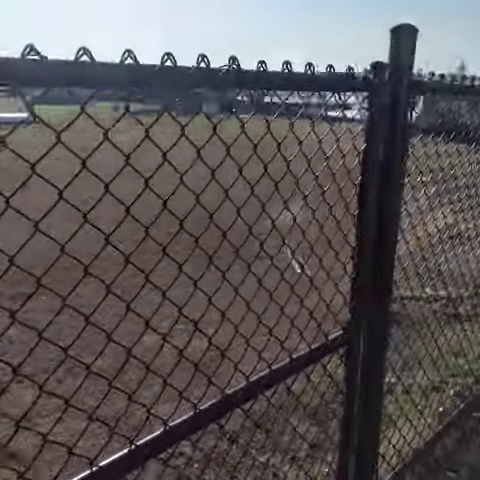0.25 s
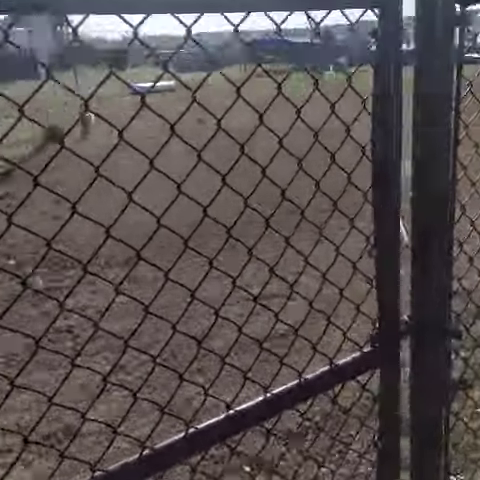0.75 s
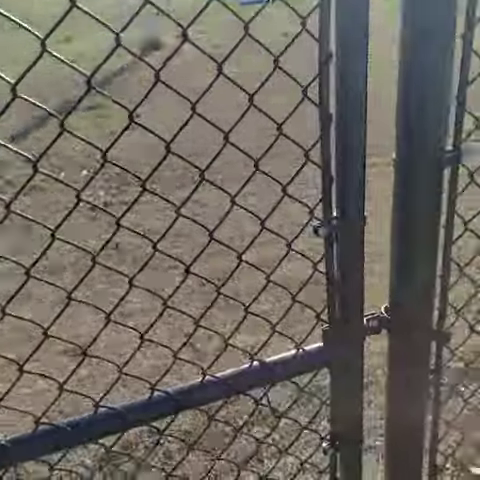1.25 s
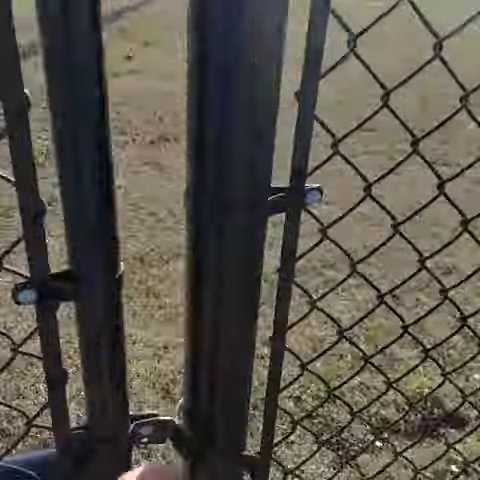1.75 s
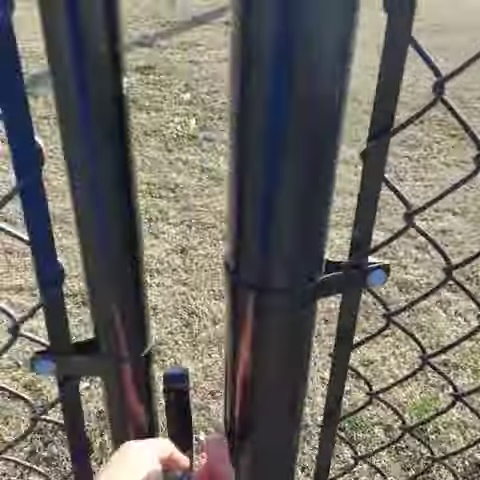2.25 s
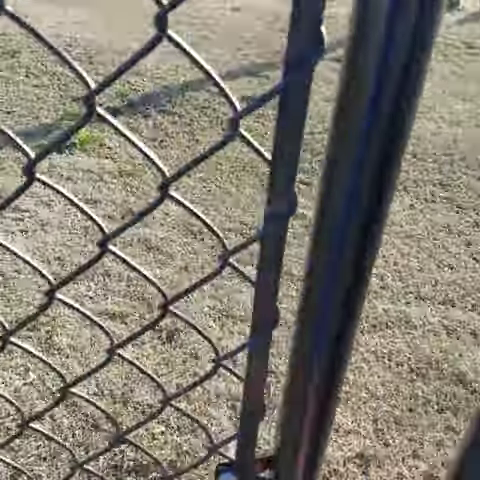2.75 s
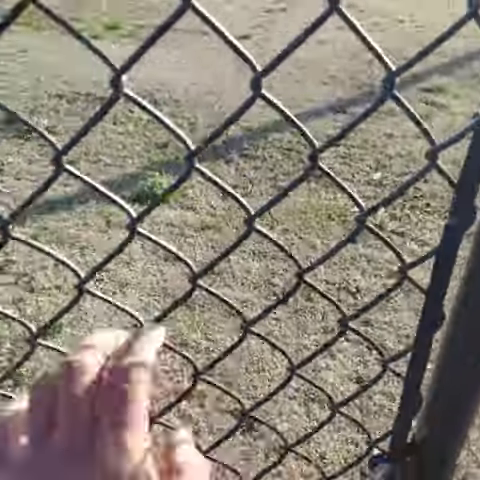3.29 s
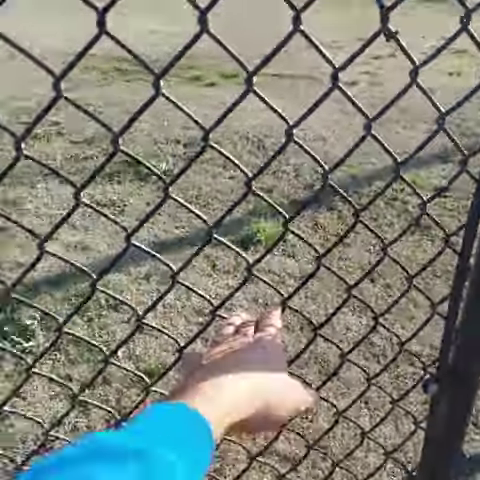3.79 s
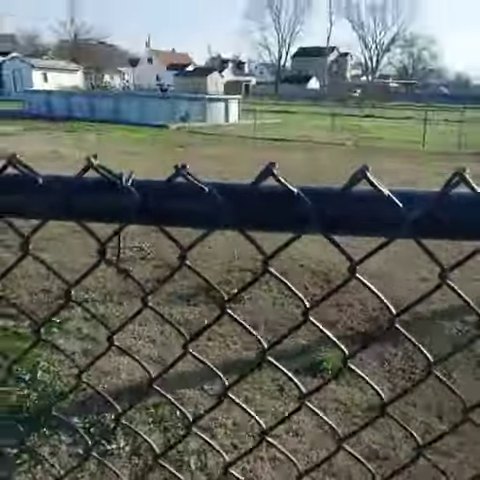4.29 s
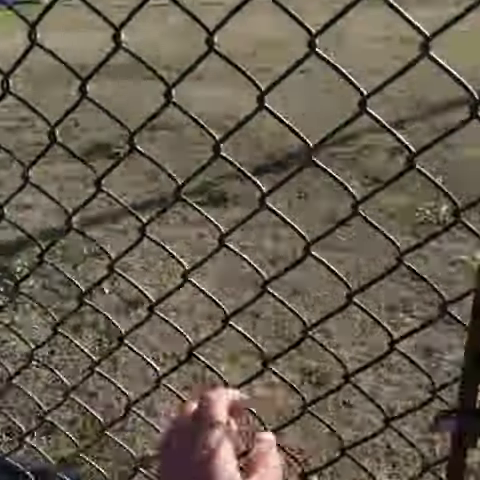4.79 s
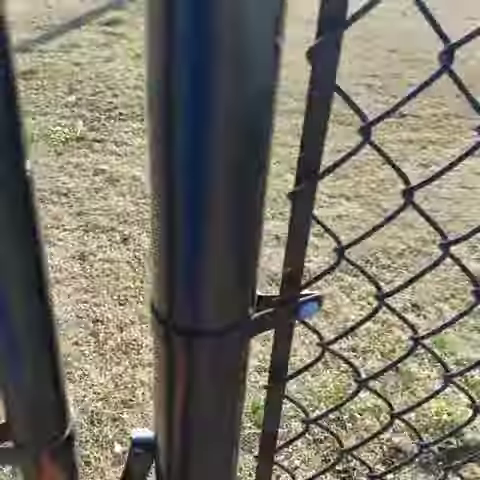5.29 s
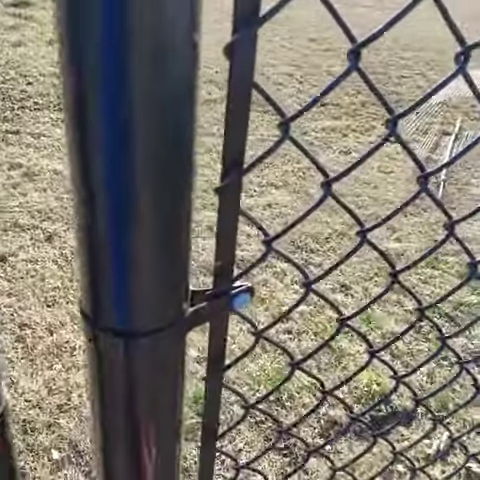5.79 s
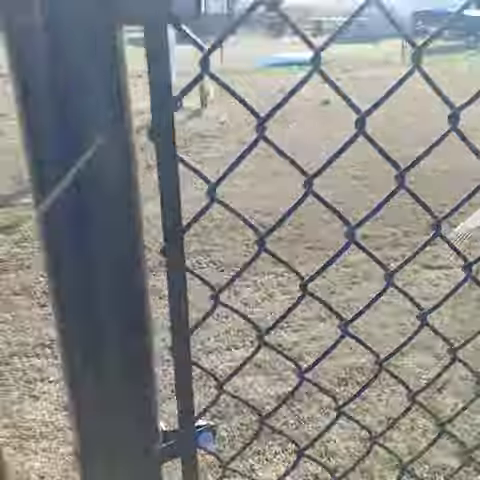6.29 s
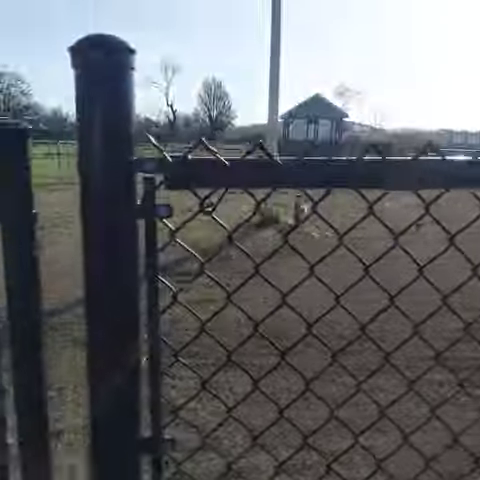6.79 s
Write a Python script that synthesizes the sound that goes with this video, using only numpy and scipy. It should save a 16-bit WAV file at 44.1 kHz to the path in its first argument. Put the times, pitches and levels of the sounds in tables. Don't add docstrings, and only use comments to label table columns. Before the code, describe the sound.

Outdoors by a chain-link gate, a bird chirps first while hollow bangs boom and roll across an open field over low traffic rumble. Then a steel latch close to a handheld stereo microphone is lifted and knocked in short chattering clanks, swings with a bright rattle, thuds and catches, and finally drops loudly and seats with the hardest clank. Dry grass rustles faintly underfoot.

```python
import sys
import numpy as np
from scipy import signal
from scipy.fft import rfft, irfft
from scipy.io import wavfile
from scipy.ndimage import uniform_filter1d

SR = 44100
rng = np.random.default_rng(int(sys.argv[2]) if len(sys.argv) > 2 else 0)


def to_wav(sig):
    pcm = np.clip(np.atleast_2d(sig), -1, 1) * 32767
    pcm = np.round(pcm).astype(np.int16)
    wavfile.write(sys.argv[1], SR, pcm.T)


def elevation(decibels):
    levels = np.asarray(decibels, float)
    return 10 ** (levels / 20)


N = 310905

# (frequency [Hz], level [dB])
TRAFFIC = [(12, -43), (20, -18), (65, -1), (127, 0.5), (241, -9), (285, -14.5), (446, -22.5), (1260, -21.5),
           (2460, -28), (3440, -38), (5850, -39.5), (8180, -44.5), (9400, -55), (12800, -55.5),
           (16000, -58)]
# (time [s], level [dB])
TRAFFIC_NEARNESS = [(0.0, -49.5), (0.61, -52.5), (1.0, -49.5), (1.49, -52), (3.77, -52.5), (4.14, -59),
                    (4.36, -48), (4.59, -55), (5.99, -52), (6.4, -53.5), (6.81, -49.5), (7.05, -53)]
# (frequency [Hz], correlation [-1..1])
PORT_LIKENESS = [(60, 1), (150, 0.98), (380, 0.93), (950, 0.52), (2380, 0.13), (5980, -0.16), (15000, 0.02)]
# (start [s], length [s], strength [dB], brightness [dB])
ECHO_ROLLS = [
    (0.0, 0.29, -52, -7),
    (.68, 0.64, -37.5, -21.5),
    (2.03, 0.17, -48, -26),
    (2.5, 0.36, -59.5, -1),
    (3.5, 0.16, -39.5, -41),
    (4.17, 0.3, -40, -11.5),
    (5.78, 0.21, -47.5, -3.5),
    (6.63, 0.4, -44, -18),
]
# (frequency [Hz], level [dB])
ECHO_TOP = [(1500, -3), (2700, -7.5), (3100, -12), (4600, -16.5), (6000, -26.5)]
# (time [s], peak [dB], bright part [dB], treble part [dB], body note [Hz])
BANGS = [(0.6559, -37.5, 8.5, -20, 200), (0.664, -15, -3.5, -24, 249), (0.894, -19, -11, -28.5, 223.5),
         (1.044, -33, 1.5, -23, 256), (1.071, -18, -3.5, -26, 248.6), (1.235, -28.5, -11, -29, 257.4),
         (1.995, -45, 4, -15, 256), (2.024, -26.5, -6.5, -22, 256), (3.501, -19, -6.5, -21, 275.4),
         (3.738, -23, -36, -32, 276.5), (3.785, -27, -16.5, -29, 261), (4.16, -23, -7.5, -17.5, 229),
         (4.293, -25, -13, -35, 271.6), (4.35, -25, -22, -24, 287), (4.942, -29, -8, -26, 185.5),
         (6.613, -28.5, -5, -29, 313.4), (6.661, -26.5, -5, -24, 189)]
# (frequency [Hz], level [dB])
BANG_BODY = [(35, -53), (60, -11), (110, -5.5), (230, 0), (330, -10.5), (480, -19.5), (800, -30),
             (1800, -30), (3300, -80)]
# (frequency [Hz], level [dB])
BANG_EDGE = [(350, 17), (600, -2), (829, -6.5), (1940, -5.5), (3270, -9), (3650, -8), (8180, -12),
             (9490, -22.5), (15000, -32)]
# (frequency [Hz], level [dB])
GRASS_FIZZ = [(1760, -33), (3000, 4), (4900, 3), (6130, 2), (6570, -3.5), (8700, -2.5), (9870, -12),
              (12500, -4), (15200, -13.5), (16000, -9.5)]
# (start [s], length [s], strength [dB], dullness [dB])
STEPS = [(0.0, 0.086, -61.5, 4.5), (.62, 0.055, -60.5, 0), (.8, 0.49, -72, 2), (1.53, 0.3, -66.5, 2.5),
         (1.92, 0.16, -62, 3.5), (2.3, 0.59, -78, 2), (2.92, 0.46, -69, 3), (3.4, 0.44, -76.5, 12.5),
         (4.18, 0.25, -75, 13.5), (4.7, 0.51, -69.5, 4), (5.2, 0.17, -78, 11), (5.55, .55, -77.5, 10.5),
         (6.67, .45, -68.5, 6.5)]
# (time [s], peak [dB])
STALK_SNAPS = [
    (1.2675, -43),
    (1.3054, -45.5),
    (3.0924, -44),
    (3.1243, -46),
    (3.1697, -46),
    (5.1138, -40.5),
    (5.2689, -47.5),
    (6.0854, -48),
]
# (time [s], pitch [Hz], level [dB])
NOTES = [
    [(.018, 3900, -52), (.035, 4470, -53), (.058, 4460, -57), (.075, 4250, -51), (.097, 3150, -53)],
    [(.02, 3300, -60), (.04, 4000, -55), (.055, 4350, -54)],
    [(2.645, 4010, -65), (2.665, 4070, -68), (2.69, 3440, -63), (2.71, 3450, -55)],
    [(5.655, 3900, -51), (5.675, 4220, -51), (5.682, 3300, -53), (5.69, 4070, -50), (5.697, 3600, -62),
     (5.705, 3850, -59), (5.72, 3800, -55)],
    [(6.53, 5250, -64), (6.537, 5700, -63), (6.565, 5700, -64)],
]
# (start [s], end [s], pitch [Hz], rate [notes/s], level [dB])
TRILLS = [
    (.14, .52, 2650, 9.1, -71),
    (2.47, 2.95, 2550, 38, -69),
    (4.6, 4.85, 2450, 38, -76),
    (6.49, 7.0, 2750, 31, -68),
]

# (time [s], peak [dB], dull part [dB], bright part [dB], ring [dB])
LIFT = [
    (2.2138, -28.5, -1, -16, 4),
    (2.2310, -28, -2, -24, -1),
]
# (time [s], peak [dB], dull part [dB], bright part [dB], ring [dB])
SLIDE = [
    (2.2387, -29.5, -3, -26, 2),
    (2.2985, -45, -6, -24, 4.6),
    (5.7300, -45.5, -8.5, -24, 4),
]
# (time [s], peak [dB], dull part [dB], bright part [dB], ring [dB])
KNOCK = [
    (2.2785, -30.5, 11, -30, 4.5),
    (2.2919, -30, 8, -25, 3),
    (2.523, -41.5, 2.2, -20, -4),
]
# (time [s], peak [dB], dull part [dB], bright part [dB], ring [dB])
STRIKE = [
    (2.3689, -21, 0.23, -18.5, 3.5),
    (2.3850, -32.5, 2, -20, -1),
]
# (time [s], peak [dB], dull part [dB], bright part [dB], ring [dB])
SWING = [
    (3.2458, -16, -5.5, -26, -1),
    (3.2658, -16, -7.5, -40, -1.5),
    (3.2790, -27, -8, -40, -4),
    (3.2914, -26.5, -14, -34, -2),
    (3.2980, -29, -10, -38, 1),
]
# (time [s], peak [dB], dull part [dB], bright part [dB], ring [dB])
HOOK = [
    (3.3040, -31.5, -9, -24, 8.9),
]
# (time [s], peak [dB], dull part [dB], bright part [dB], ring [dB])
PINGS = [
    (3.3654, -34.5, -5, 2, 3.5),
    (3.3710, -36.5, -1, -15, 8.7),
    (3.4051, -28.5, -4, -8, 3.2),
    (3.4381, -40, -17, -12, 2.7),
    (5.1094, -58, -1, 2, 2.7),
]
# (time [s], peak [dB], dull part [dB], bright part [dB], ring [dB])
NUDGE = [
    (2.0515, -25, 1, -17, 7),
    (3.7723, -42, -14, -26, -15),
    (5.721, -32, -20, -45, -1),
    (2.2880, -38, -14, -23, -6),
    (5.8127, -14.5, -5, -14, 0),
    (5.8681, -19, -16.5, -37, -11),
    (5.8760, -28.5, -14, -43, -12),
    (4.1830, -40, -8, -30, -4),
    (6.6740, -43, -11, -30, -1),
]
# (time [s], peak [dB], dull part [dB], bright part [dB], ring [dB])
THUD = [
    (5.1738, -29.5, 9.1, -24, 4.2),
    (5.1880, -39, 14, -30, 4.6),
    (5.5210, -36, 12, -25, 3.2),
    (5.6310, -39, 6.6, -25, 2),
    (5.6390, -41, 8, -25, 2),
]
# (time [s], peak [dB], dull part [dB], bright part [dB], ring [dB])
CATCH = [
    (5.3327, -17.5, -0.1, -17, 4),
    (5.3455, -28, -1, -8, -8),
]
# (time [s], peak [dB], dull part [dB], bright part [dB], ring [dB])
FORK = [
    (1.9064, -42.5, -17, 12, 2),
    (5.5040, -56, -2, -7, 5),
    (5.5250, -44, 2, -6, 7.5),
    (6.0370, -37.5, -1, -23, 2.5),
    (6.1425, -32, 6, -30, -11),
    (6.1800, -59, 0, -22, 9),
    (6.1900, -56, 0, -22, 7),
    (6.5542, -37, 1, -41, -7),
]
# (time [s], peak [dB], dull part [dB], bright part [dB], ring [dB])
DROP = [
    (5.7818, -7.5, -9.5, -9, 1),
    (5.7944, -16.5, -5.5, -24, 0),
]
# (time [s], peak [dB], dull part [dB], bright part [dB], ring [dB])
SEAT = [
    (5.9557, -12.5, -11, -24, -10.5),
    (5.9654, -20.5, 3.5, -30, -4),
    (5.9700, -7, -10.5, -16.5, -1.5),
    (5.9770, -12, -10.5, -16.5, -1.5),
    (5.9890, -28, -1, -28, 0),
]

# (frequency [Hz], level [dB], t60 [s])
LIFT_MODES = [(617, -2, .06), (1074, 6, .04), (1733, -3, 0.087), (3300, -1.5, .07), (3900, -5.5, .06),
              (4850, -8, .07), (6309, -8, 0.098), (7520, -11, .05), (8040, -4, .045), (9260, -16, .09)]
# (frequency [Hz], level [dB], t60 [s])
SLIDE_MODES = [(3337, 0.5, 0.17), (3700, -13, .04), (1000, -5, 0.0302), (7520, -15, 0.0305)]
# (frequency [Hz], level [dB], t60 [s])
KNOCK_MODES = [(470, -2.5, 0.065), (1065, 5.5, 0.042), (1810, -8, 0.033), (3900, -7, 0.045),
               (4200, -19, .03), (5900, -26, .03)]
# (frequency [Hz], level [dB], t60 [s])
STRIKE_MODES = [(610, -7.5, .04), (1203, 4.5, 0.04), (1763, 0, .06), (1870, -7, 0.061), (3320, -5, .05),
                (3467, 1, 0.085), (3980, -13, .08), (4818, -14, .05), (8100, -20, .06)]
# (frequency [Hz], level [dB], t60 [s])
SWING_MODES = [(1000, -7, .022), (1750, -15, 0.45), (2293, 4.5, 0.032), (2296, -18.5, 0.46),
               (2820, -11, .22), (3340, -3, 0.093), (4150, 0, .06), (4600, 2, .035), (5040, 1, 0.026),
               (5760, -5, 0.048), (6400, -20, 0.28), (7520, -18, 0.39), (8070, -19, 0.25), (3920, -11, .1)]
# (frequency [Hz], level [dB], t60 [s])
HOOK_MODES = [(3720, 0, .15), (1750, -12, .3)]
# (frequency [Hz], level [dB], t60 [s])
PING_MODES = [(975, -11, .05), (2250, -16, 0.058), (3270, 3.5, .045), (3480, -9, 0.043), (5030, -16, .02)]
# (frequency [Hz], level [dB], t60 [s])
NUDGE_MODES = [(1081, 1, 0.0303), (2000, -7.5, .03), (3230, -21, .12), (3815, -7, .09), (4320, 9.5, 0.021),
               (4750, 0, .03), (6100, -17, .027), (6340, -15, .045)]
# (frequency [Hz], level [dB], t60 [s])
THUD_MODES = [(487, -7, 0.058), (1146, -3.5, 0.057), (1576, 5, 0.027), (2213, -16, 0.036),
              (3335, -19.5, 0.18)]
# (frequency [Hz], level [dB], t60 [s])
CATCH_MODES = [(768, -12, 0.14), (1627, 11.5, 0.024), (2070, 1.5, 0.024), (2956, 7.5, 0.058),
               (3310, -13, 0.21), (3856, -4, 0.19), (3900, 5, 0.078), (4100, -18, 0.17), (5570, -28, .2),
               (6213, -10, 0.035), (7278, -19, 0.17), (8200, -19, 0.036)]
# (frequency [Hz], level [dB], t60 [s])
FORK_MODES = [(2950, -24, 0.054), (3827, 0, 0.18), (3870, -6, .06), (7300, -18, 0.11), (7500, -15, 0.036)]
# (frequency [Hz], level [dB], t60 [s])
DROP_MODES = [(698, -14, .06), (1933, -18.5, 0.097), (2850, -28.5, 0.28), (3360, -26, 0.51),
              (3800, -25.5, .25), (4273, -8, .045), (4650, -12, .08), (5520, -20.5, 0.12),
              (6320, 0.5, .042), (7330, -11, 0.15), (7610, -0.5, .045), (9270, -37.5, .15),
              (11730, -30, .14), (12600, -22, .08)]
# (frequency [Hz], level [dB], t60 [s])
SEAT_MODES = [(554, -3.5, 0.026), (1044, -7.5, 0.046), (1604, -5.5, .03), (2640, -11, 0.044),
              (3300, -15.5, 0.15), (3860, -2.5, .07), (3937, 1, 0.1), (4400, -1, .035), (4680, -2, .045),
              (5410, -20, .09), (7284, -10, 0.09), (7634, -9.5, 0.037), (11720, -20, .09),
              (12700, -15, .03)]
BAR_HZ = np.array([3329, 3465, 3720, 3815, 3905, 6368, 7281, 7554])
# (frequency [Hz], level [dB])
CLANK = [(180, -35), (400, -15.5), (1000, -11.5), (2200, -5.5), (4200, 6.5), (7000, -13.5), (10200, -29),
         (12800, -24.5), (16000, -37)]
# (frequency [Hz], phase [rad])
LATCH_PHASE = [(500, .8), (1300, 1.7), (1600, 4.6), (2000, 6.6), (3400, 8.2), (4000, 11.1), (5000, 11),
               (6400, 12.9), (8500, 11), (13000, 10.5)]
CHATTER_S = {"lift": 0.076, "slide": 0.044, "knock": 0.06, "strike": 0.042, "swing": 0.028, "hook": 0.044,
             "pings": .025, "nudge": 0.047, "thud": .03, "catch": 0.062, "fork": 0.046, "drop": 0.089,
             "seat": .05}
DAMPED_S = {"swing": 3.364, "hook": 3.356}


def evened(x):
    return x / np.sqrt(np.mean(x ** 2) + 1e-20)


def read(points, hz):
    f, value = np.transpose(points)
    return np.interp(np.log(hz + 1), np.log(f + 1), value)


def add(mix, s, sound):
    part = mix[..., round(s * SR):][..., :sound.shape[-1]]
    part += sound[..., :part.shape[-1]]


def coloured(x, spectrum, lo_hz=0, hi_hz=30000):
    hz = np.fft.rfftfreq(x.shape[-1], 1 / SR) + 1
    edges = 1 / (1 + (lo_hz / hz) ** 6) / (1 + (hz / hi_hz) ** 6)
    return evened(irfft(rfft(x) * elevation(read(spectrum, hz)) * edges, x.shape[-1]))


def pair(x, likeness=0.98):
    hz = np.fft.rfftfreq(x.shape[-1], 1 / SR)
    same = np.clip(likeness * read(PORT_LIKENESS, hz), -1, 1)
    left, other = rfft(x)
    right = same * left + np.sqrt(1 - same ** 2) * other
    return irfft(np.array([left, right]), x.shape[-1])


def air():
    return pair(rng.standard_normal((2, N)))


def lumps(per_s, depth_db):
    width = int(SR / per_s)
    drift = uniform_filter1d(uniform_filter1d(rng.standard_normal(N), width), width)
    return elevation(depth_db * evened(drift))


def swells(rows, rise_s, fall_s, calm_db):
    t = np.arange(N) / SR
    power = np.ones((2, N)) * elevation(np.array(calm_db))[:, None] ** 2
    for start, length, db, tilt_db in rows:
        rise = np.clip((t - start) / rise_s + .5, 0, 1)
        fall = elevation(-20 * np.maximum(t - start - length, 0) / fall_s)
        power += (elevation(np.array([[db], [db + tilt_db]])) * rise * fall) ** 2
    return np.sqrt(power)


def traffic():
    near_db = np.interp(np.arange(N) / SR, *np.transpose(TRAFFIC_NEARNESS))
    rumble_db = -36.5 + 0.092 * (near_db - near_db.mean())
    rumble = coloured(air(), TRAFFIC, 29, 174.4) * elevation(rumble_db) * lumps(25, 1.3)
    hiss = coloured(air(), TRAFFIC, 389, 1800) * elevation(near_db) * lumps(23, 2.43)
    top = coloured(air(), TRAFFIC, 3500)
    wind = coloured(rng.standard_normal((2, N)), TRAFFIC, 30.3, 90) * lumps(8, 3.1)
    return rumble + elevation(1.5) * hiss + elevation(-67.0) * top + elevation(-58) * wind


def echoes():
    low_gain, high_gain = swells(ECHO_ROLLS, rise_s=0.078, fall_s=0.085, calm_db=[-47, -66])
    low = coloured(air(), TRAFFIC, 171.5, 557) * low_gain * lumps(28, 3.47)
    high = coloured(air(), ECHO_TOP, 1700, 6000) * high_gain * lumps(40, 1.1)
    return low + high


def bang(s, db, bright_db, treble_db, hz):
    t = np.arange(SR // 2) / SR
    t60 = max(0.23 + 0.018 * (-14.5 - db), .05)
    boom = coloured(pair(rng.standard_normal((2, len(t)))), BANG_BODY)
    boom += 1.33 * np.sin(2 * np.pi * hz * t)
    boom *= (1 - np.exp(-t / 0.0013)) * elevation(-60 * t / t60)
    edge = coloured(pair(rng.standard_normal((2, len(t))), 2.1), BANG_EDGE, 374, 3230)
    treble = coloured(rng.standard_normal((2, len(t))), BANG_EDGE, 2700)
    edge += elevation(treble_db - bright_db + 2.0) * treble
    edge_fall = elevation(-60 * t / (0.34 * t60)) + 0.31 * elevation(-60 * t / (2.1 * t60))
    edge *= (1 - np.exp(-t / 0.0025)) * edge_fall
    return s, elevation(db - 9.5) * (boom + elevation(bright_db + 4.5) * edge)


def birds():
    out = np.zeros(N)
    for rows in NOTES:
        s, hz, db = np.transpose(rows)
        t = np.arange(s[0], s[-1], 1 / SR)
        phase = 2 * np.pi * np.cumsum(np.interp(t, s, hz)) / SR
        tone = np.sin(phase) * elevation(np.interp(t, s, db))
        add(out, s[0], tone * lumps(270, 4.2)[:len(t)] * signal.windows.tukey(len(t), .3))
    for start, end, hz, per_s, db in TRILLS:
        turn = (np.arange(0, end - start, 1 / SR) * per_s) % 1
        note = np.clip(turn / per_s / 0.042, 0, 1)
        tone = np.sin(2 * np.pi * np.cumsum(hz * (1.06 - 0.12 * note)) / SR)
        add(out, start, elevation(db) * lumps(37, 4.8)[:len(turn)] * np.sin(np.pi * note) ** 2 * tone)
    return np.array([out, elevation(7.5) * np.roll(out, 3)])


def rustle():
    snaps = elevation(2.2 * np.minimum(rng.exponential(1, N), 3.5)) * (rng.random(N) < 900 / SR)
    gate = 1 + 0.33 * signal.lfilter([1], [1, -.985], snaps)
    fizz_gain, swish_gain = swells(STEPS, rise_s=0.076, fall_s=0.28, calm_db=[-85.5, -70.5])
    fizz = coloured(air() * gate, GRASS_FIZZ, 8000) * fizz_gain
    swish = coloured(air() * gate, GRASS_FIZZ, 3500, 9500) * swish_gain
    return (elevation(8.0) * fizz + swish) * lumps(35, 0.63)


def stalks():
    out, t = np.zeros((2, N)), np.arange(1024) / SR
    for s, db in STALK_SNAPS:
        snap = coloured(rng.standard_normal((2, 1024)), GRASS_FIZZ, 8700)
        add(out, s, elevation(db - 2.5) * snap * elevation(-60 * t / 0.032))
    return out


def clank(dull_db, bright_db):
    t = np.arange(2048) / SR
    hz, lead = np.transpose(LATCH_PHASE)
    grit = rng.standard_normal((2, 2048))
    shift = np.exp(-1j * np.interp(np.fft.rfftfreq(2048, 1 / SR), hz, lead))
    grit[1] = .65 * irfft(rfft(grit[0]) * shift) + .76 * grit[1]
    out = coloured(grit, CLANK, 2700, 7850)
    out += elevation(dull_db + 5.5) * coloured(grit, CLANK, 380, 1780)
    out += elevation(bright_db + 10.5) * coloured(grit, CLANK, 7800)
    return out * (1 - np.exp(-t / 0.00087)) * elevation(-60 * t / 0.021)


def steel_ring(modes, chatter, t):
    mode_hz, mode_db, ring_s = np.array(modes).T[..., None]
    bar_hz = np.take(BAR_HZ, abs(mode_hz - BAR_HZ).argmin(1))[:, None]
    mode_hz = np.where(abs(mode_hz / bar_hz - 1) < .018, bar_hz, mode_hz)
    vibration = np.exp((2j * np.pi * mode_hz - np.log(1000) / np.clip(ring_s, .02, .8)) * t)
    drive = abs(np.exp(2j * np.pi * mode_hz * t[:2048]) @ chatter[:2048])
    lead = np.interp(mode_hz[:, 0], *np.transpose(LATCH_PHASE))
    ports = np.exp(-1j * np.array([0 * drive, lead])) * elevation(mode_db[:, 0]) / drive
    fade = np.minimum(8 * (1 - t / t[-1]), 1)
    ring = (ports @ vibration).imag * (1 - np.exp(-t / 0.00066)) * fade
    return signal.fftconvolve(chatter[None], ring, axes=1)[:, :len(t)]


def blow(row, modes, t60, damped_s):
    s, db, dull_db, bright_db, ring_db = row
    t = np.arange(12288) / SR
    impacts = rng.standard_normal(6144) * (rng.random(6144) < 2500 / SR)
    impacts[0] = 2.74
    chatter = impacts * elevation(-60 * t[:6144] / max(t60, .005))
    shiver = impacts * elevation(-18 - 60 * t[:6144] / 0.11)
    clanks = signal.fftconvolve((chatter + shiver)[None], clank(dull_db, bright_db), axes=1)
    ring = steel_ring(modes, chatter, t) * elevation(-1500 * np.maximum(s + t - damped_s, 0))
    out = elevation(ring_db) * ring / abs(ring).max()
    add(out, 0, clanks / abs(clanks).max())
    return s, elevation(db + 2.5) * out


def latch():
    out = np.zeros((2, N))
    places = dict(lift=(LIFT, LIFT_MODES), slide=(SLIDE, SLIDE_MODES), knock=(KNOCK, KNOCK_MODES),
                  strike=(STRIKE, STRIKE_MODES), swing=(SWING, SWING_MODES), hook=(HOOK, HOOK_MODES),
                  pings=(PINGS, PING_MODES), nudge=(NUDGE, NUDGE_MODES), thud=(THUD, THUD_MODES),
                  catch=(CATCH, CATCH_MODES), fork=(FORK, FORK_MODES), drop=(DROP, DROP_MODES),
                  seat=(SEAT, SEAT_MODES))
    for place, (rows, modes) in places.items():
        for row in rows:
            add(out, *blow(row, modes, CHATTER_S[place], DAMPED_S.get(place, N / SR)))
    return out * elevation(np.array([[.4], [-.4]]))


def scene():
    mix = traffic() + echoes() + birds() + rustle() + stalks()
    for row in BANGS:
        add(mix, *bang(*row))
    return mix + latch()


def roll_off(x):
    return signal.sosfilt(signal.butter(12, 16660, fs=SR, output="sos"), x)


def record(dry):
    hz, _, z = signal.stft(dry, SR, nperseg=1024, noverlap=768)
    band_db = 10 * np.log10(uniform_filter1d(abs(z) ** 2, size=12, axis=1) + 1e-20)
    loudest_db = band_db[:, hz > 2000].max(1, keepdims=True)
    masked = np.clip((loudest_db - 37 - band_db) / 4, 0, 1)
    weak = masked * (hz > 5500)[:, None] * (loudest_db > -56)
    kept = signal.istft(z * elevation(-22 * weak), SR, nperseg=1024, noverlap=768)[1][:, :N]
    band_limit = signal.firwin(1201, 15900, window=("kaiser", 8), fs=SR)
    limited = signal.oaconvolve(kept, band_limit[None], "same")
    return roll_off(limited)


dry = scene()
out = record(dry)
to_wav(out)
```